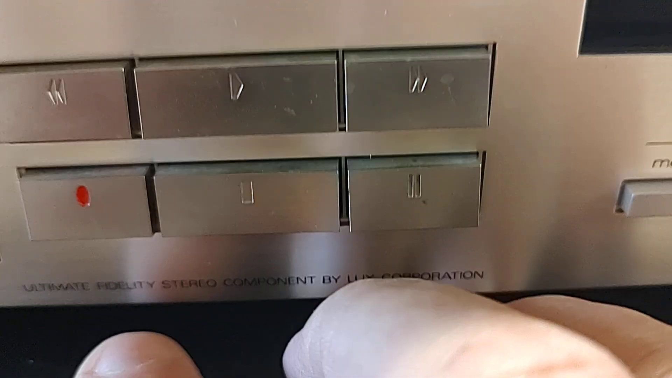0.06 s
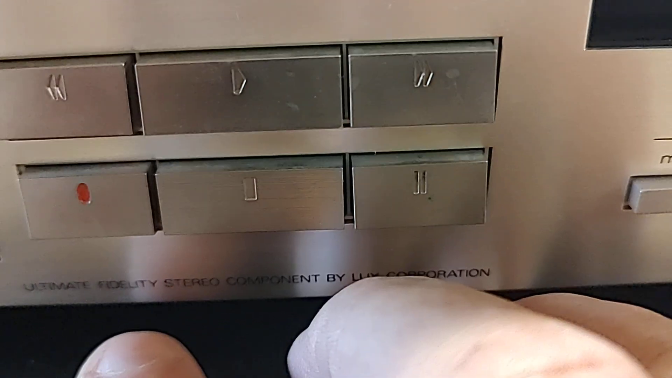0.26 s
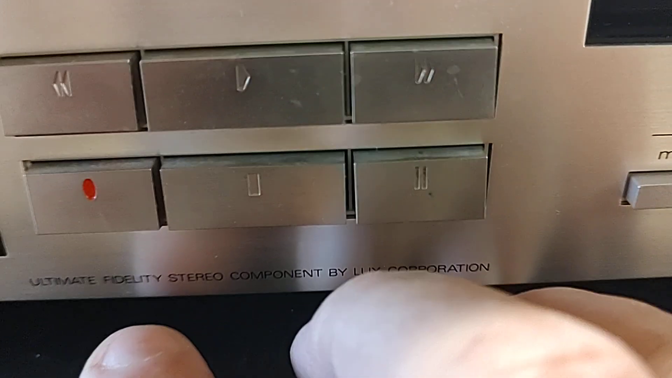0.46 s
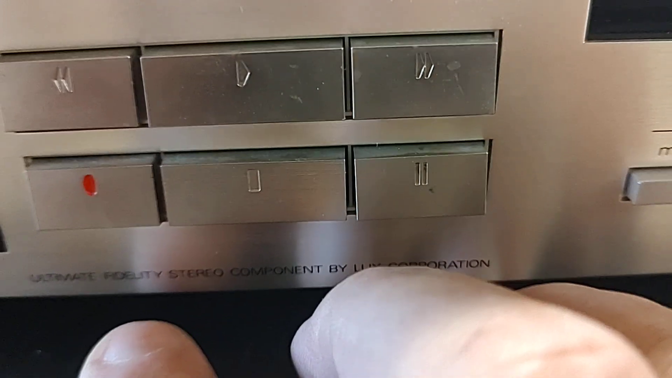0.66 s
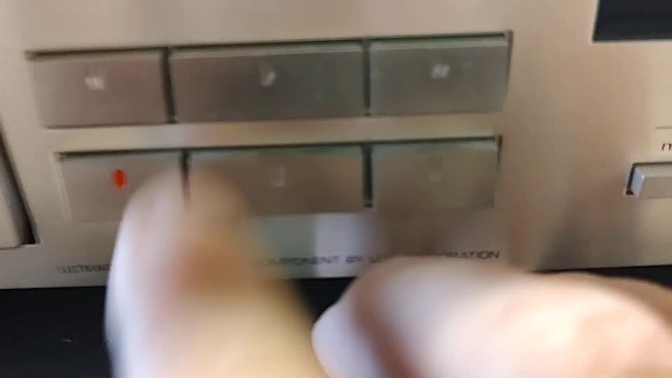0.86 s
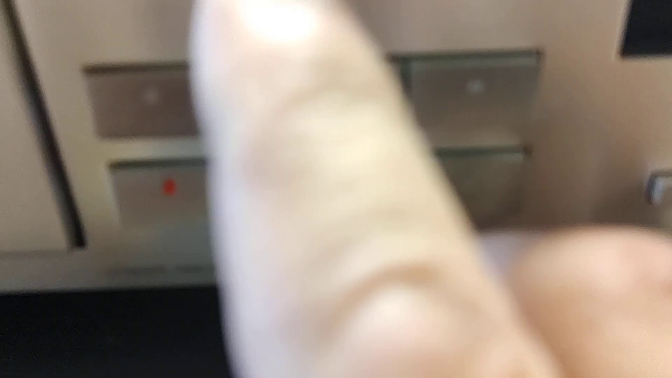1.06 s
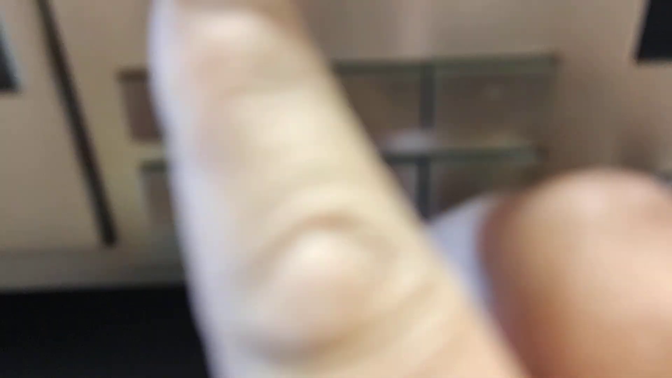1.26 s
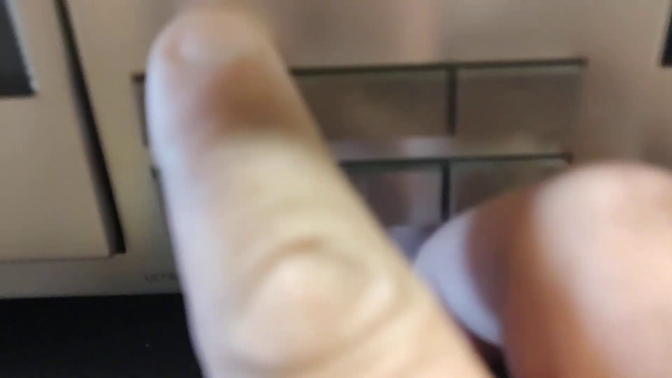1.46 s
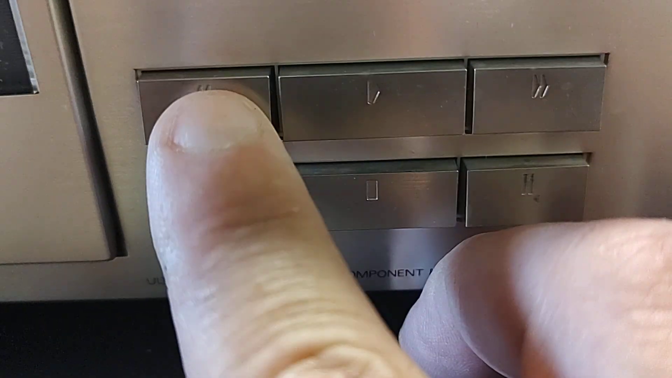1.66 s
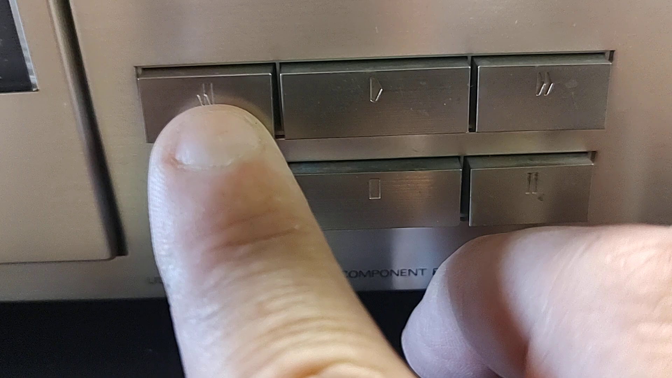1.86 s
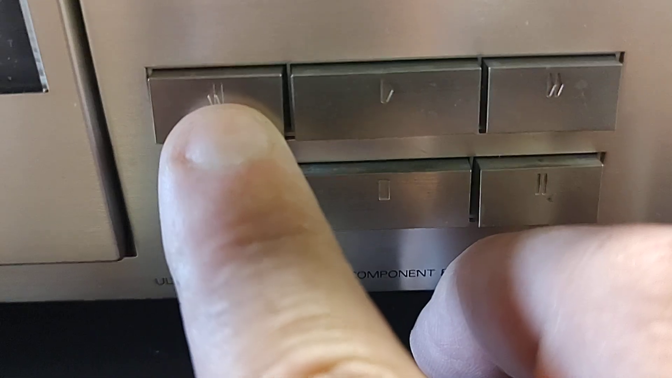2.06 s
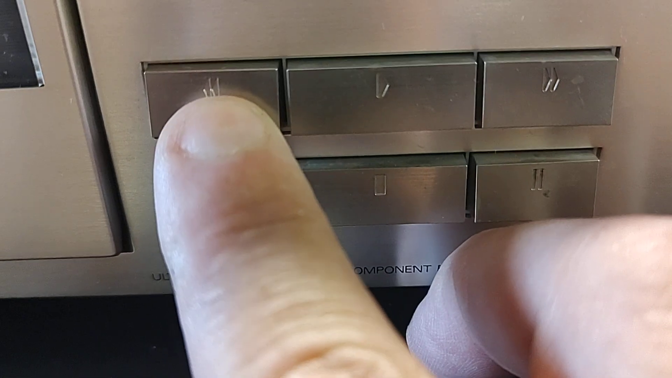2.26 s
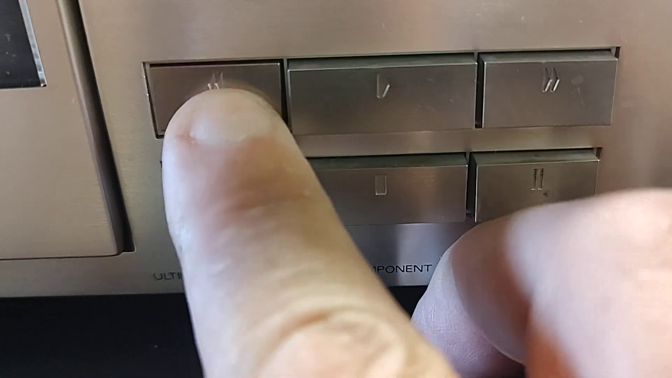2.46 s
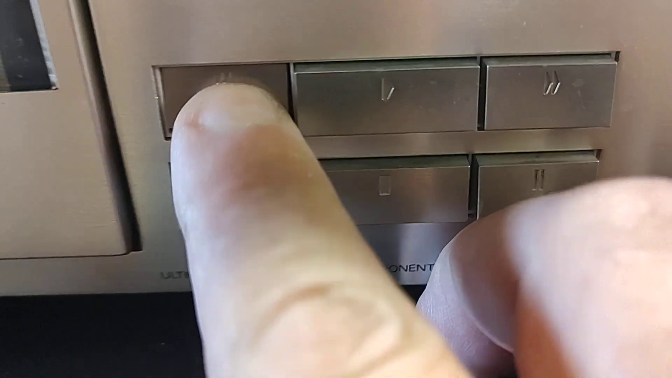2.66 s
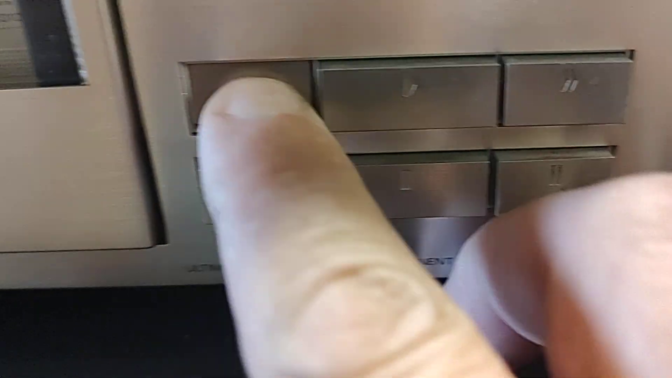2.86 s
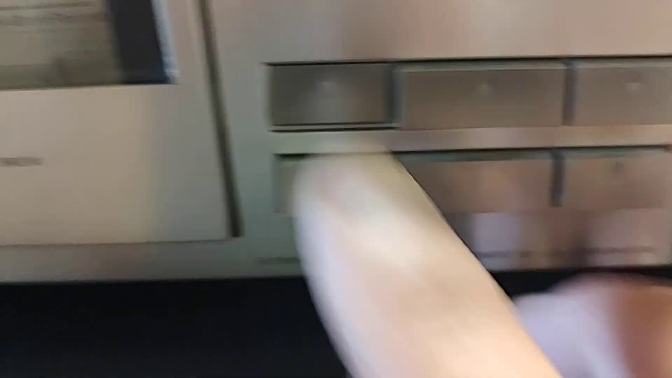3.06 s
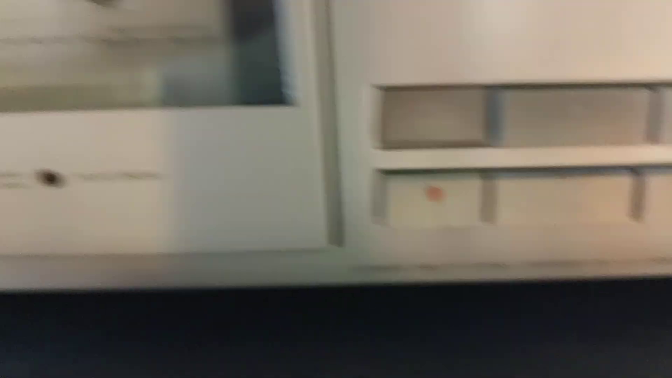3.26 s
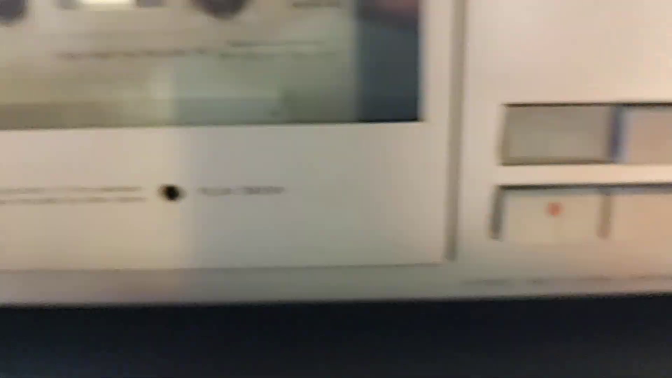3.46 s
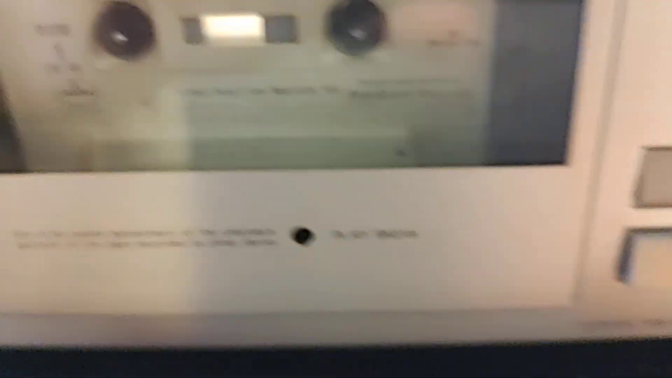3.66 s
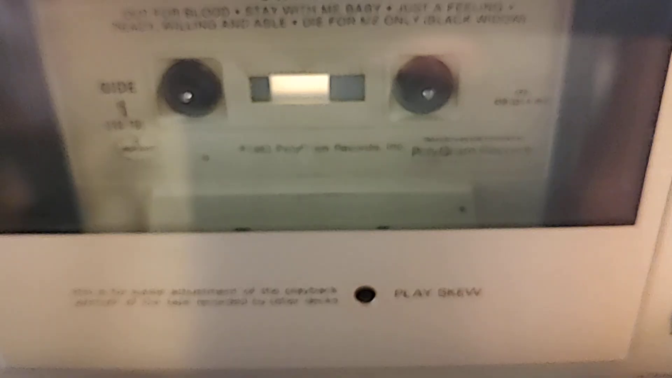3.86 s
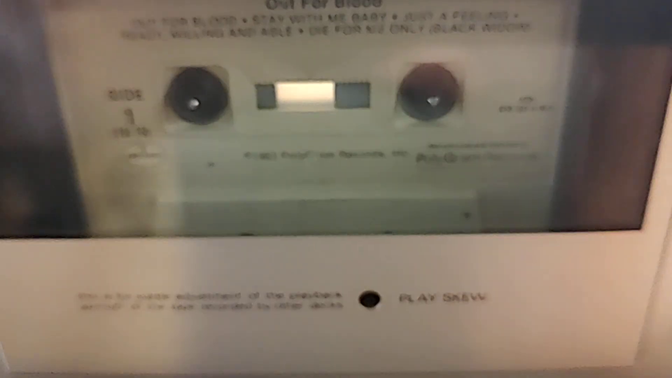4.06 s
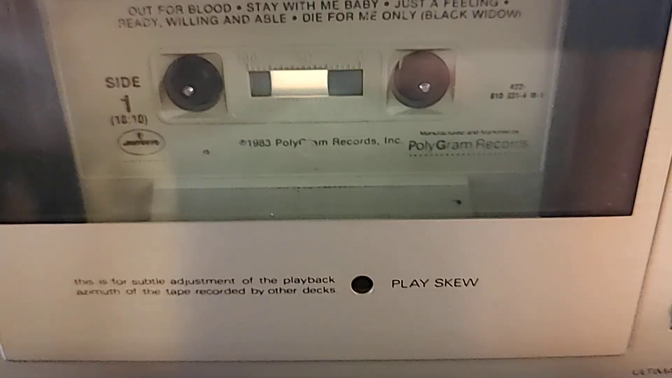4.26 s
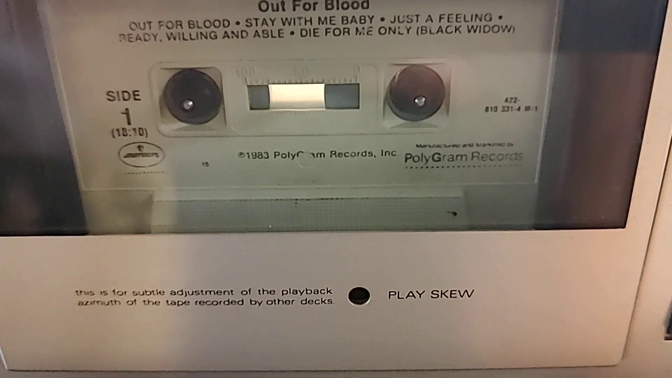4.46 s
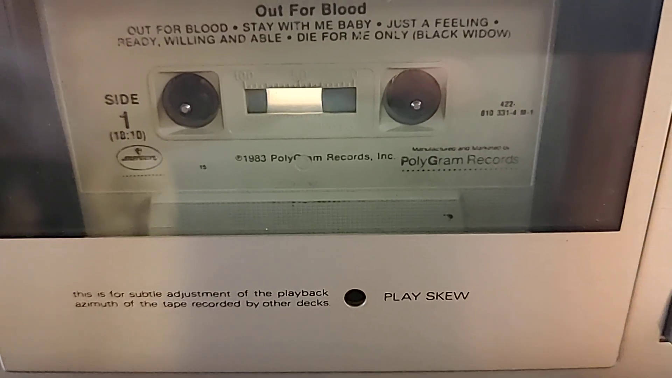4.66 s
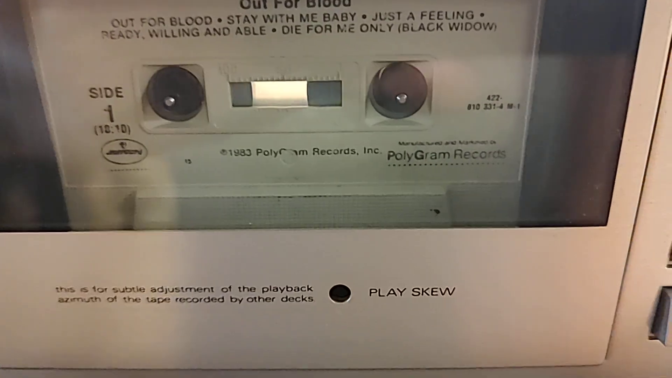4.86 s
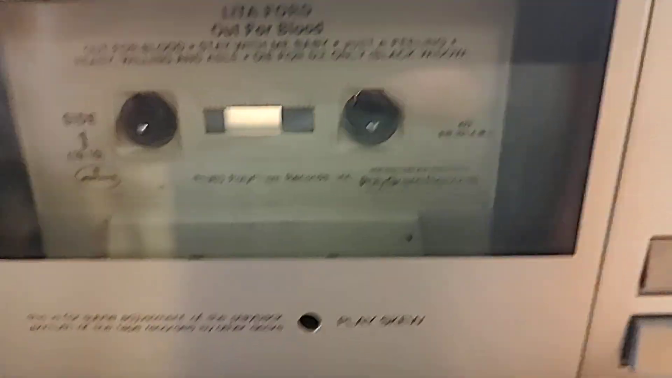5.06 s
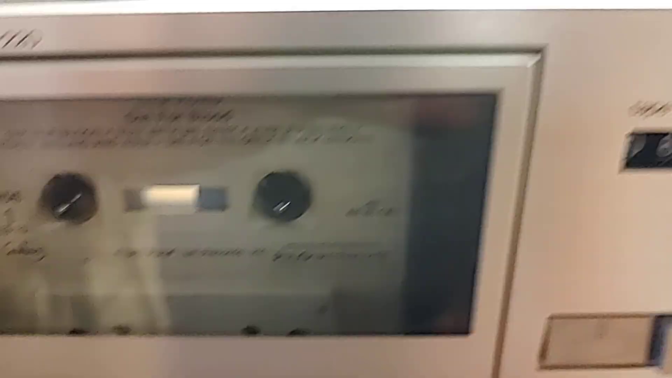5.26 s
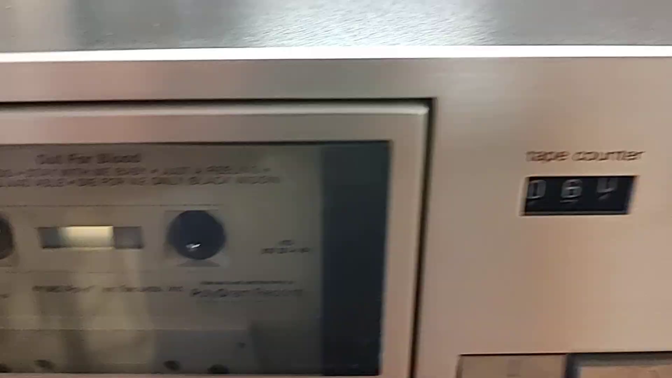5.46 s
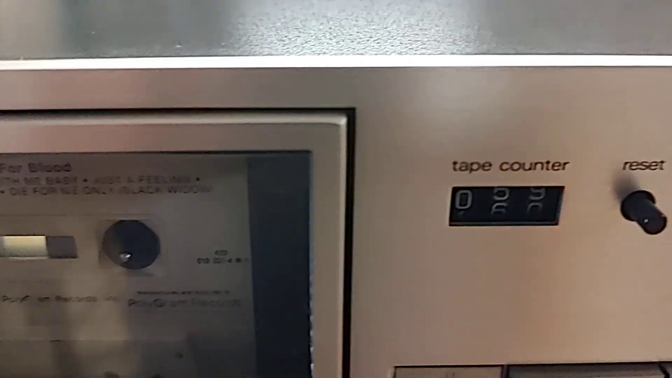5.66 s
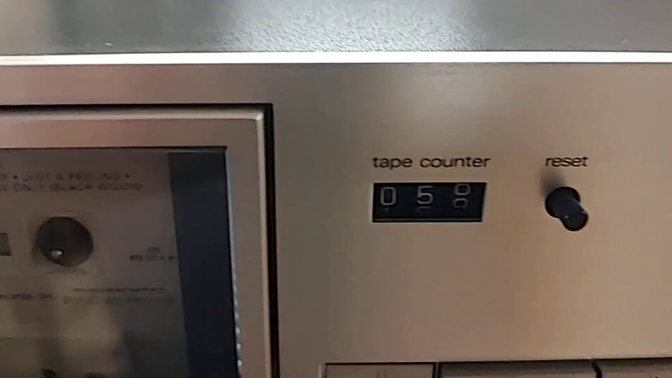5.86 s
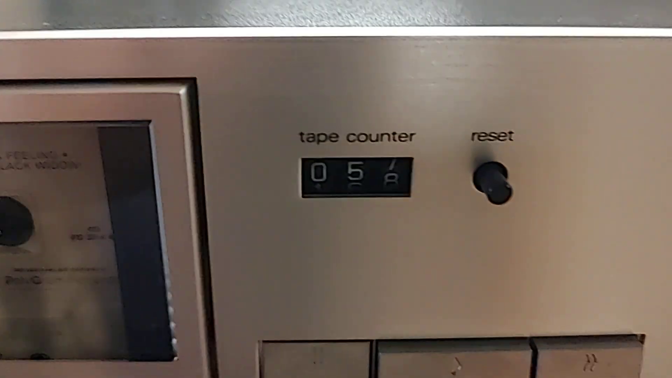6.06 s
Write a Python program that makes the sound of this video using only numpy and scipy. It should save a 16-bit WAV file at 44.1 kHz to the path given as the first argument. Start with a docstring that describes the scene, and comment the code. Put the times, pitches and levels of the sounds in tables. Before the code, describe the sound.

Close stereo pickup of a tape deck indoors: faint low hum, slight hiss, soft finger touches and two small hard ticks. After about two and a half seconds a lever and solenoid clunk sharply, then a rough, rapidly fluttering whir runs to the end. Metallic hand scrapes and dull handling knocks come just after it starts; later, light dry ticks and rattles ride over the whir, which leans left and grows brighter.

```python
"""Hum and motor buzz of an idling tape deck in a quiet room, with faint finger touches on its panel.
Something nearby gives two double ticks; then a key is pressed, a solenoid clunks and the reels rewind.
Noise drives the rubbing and struck parts, resonances colour it, and wavering sines make hum and gear mesh.
A hand-held stereo microphone, its left port facing the deck, is bumped and scraped and drifts along the front."""
import sys
import numpy as np
from scipy import signal
from scipy.fft import rfft, irfft, next_fast_len
from scipy.io import wavfile

SR = 44100
rng = np.random.default_rng(int(sys.argv[2]) if len(sys.argv) > 2 else 0)


def voltage_ratio(level):
    """Linear amplitude factor for a level in decibels (scalar or array-like)."""
    return 10 ** (np.asarray(level, float) / 20)


def unload_audio(sound):
    """Save the sound as a 16-bit wav file, at the path given as the first command line argument."""
    columns = np.transpose(np.atleast_2d(sound))
    # keep every value between -1 and 1, then stretch to whole-number steps
    steps = np.round(np.clip(columns, -1, 1) * 32767)
    wavfile.write(sys.argv[1], SR, steps.astype(np.int16))


N = 269451
SIZE = next_fast_len(N + 8192)
HZ = np.maximum(np.fft.rfftfreq(SIZE, 1 / SR), 1)
TIME = np.arange(N) / SR

# All table and source levels are relative: later gains and filters still act on them.
REEL_HZ = 34.92   # turns of the reel motor a second
ENGAGE_S, SPIN_UP_S = 2.65, 0.1146   # the reels are clutched in
LOADED = np.clip((TIME - ENGAGE_S) / SPIN_UP_S, 0, 1)   # 0 idling, 1 pulling the tape

# How far the left port exceeds the right for sound from the room: pitch_hz, lean_db
ROOM_LEAN = [(60, 2.5), (180, 1.5), (550, 5.5), (1650, 8.5), (4970, 7.5), (15000, 1.5)]
# The same for sound from the deck: pitch_hz, lean_db
DECK_LEAN = [(250, 15), (640, 13), (1350, 17.5), (2300, 12.5), (3300, 10.5), (4000, 10.5), (5500, 1),
             (6600, 20), (7500, 13), (9000, 22), (11500, 50), (15000, 53)]


def rms_one(x):
    """Scale to rms 1."""
    return x / np.sqrt(np.mean(x ** 2) + 1e-20)


def in_time(rows):
    """Columns of a curve table, interpolated sample by sample."""
    s, *columns = np.transpose(rows)
    return [np.interp(TIME, s, column) for column in columns]


def at_hz(points):
    """A spectrum table interpolated over log frequency on the FFT grid."""
    hz, values = np.transpose(points)
    return np.interp(np.log(HZ), np.log(hz), values)


def drift(rate_hz):
    """Slow random wander of spread 1, drawn at every 40th sample."""
    r = np.exp(-80 * np.pi * rate_hz / SR)
    noise = rng.standard_normal(N // 40 + 2002)
    slow = signal.lfilter([1], [1, -2 * r, r * r], noise)[2000:]
    return np.interp(np.arange(N) / 40, np.arange(len(slow)), rms_one(slow))


def noise_pair():
    """Two unrelated white noises, one for each path to the ports."""
    return rng.standard_normal((2, N))


def band(x, low_hz, high_hz):
    """Band-pass."""
    return signal.sosfilt(signal.butter(2, [low_hz, high_hz], "band", fs=SR, output="sos"), x)


def ring(force, hz, t60_s):
    """A resonance: a unit click sets a decaying sine of starting height 1 ringing."""
    r, w = 10 ** (-3 / (t60_s * SR)), 2 * np.pi * hz / SR
    return signal.lfilter([0, np.sin(w)], [1, -2 * r * np.cos(w), r * r], force + 1e-18)


def bursts(times_s, levels_db, decay_ms, rise_ms=0.71):
    """Envelope of quick exponential rises that die away; both times are time constants."""
    out = np.zeros(N)
    for s, db, ms in np.broadcast(times_s, levels_db, decay_ms):
        start = int(s * SR)
        after = np.arange(min(int((ms + rise_ms) * SR / 125), N - start))
        t_ms = after * 1000 / SR
        out[start + after] += voltage_ratio(db) * np.exp(-t_ms / ms) * (1 - np.exp(-t_ms / rise_ms))
    return out


def struck(envelope, modes, ring_db):
    """Noisy contact force into a body's modes, drawn anew for each mode and path."""
    rung = sum(voltage_ratio(db) * ring(envelope * noise_pair(), hz, t60_s) for hz, db, t60_s in modes)
    return voltage_ratio(ring_db) * rung


def tone(hz, waver_db, waver_rad=0.34):
    """A sine of nominal rms 1 whose level and phase waver."""
    phase = 2 * np.pi * (np.cumsum(hz) / SR + rng.random()) + waver_rad * drift(2.1)
    return np.sqrt(2) * voltage_ratio(waver_db * drift(10.7)) * np.sin(phase)


def ports(pair, lean, colour=1):
    """The right port hears the left's sound later and weaker, mixed with an unrelated path."""
    # left-right likeness, falling towards the treble: pitch_hz, share (0 to 1)
    likeness = [(60, 1), (250, 1), (600, 0.7), (1200, 0.5), (4000, 0.56), (8000, 0.22)]
    lag_s = .0003
    near, other = rfft(pair, SIZE) * colour
    alike = np.clip(at_hz(likeness), 0, 1)
    late = near * np.exp(-2j * np.pi * HZ * lag_s)
    right = alike * late + np.sqrt(1 - alike ** 2) * other
    return irfft([near, right * voltage_ratio(-at_hz(lean))], SIZE)[:, :N]


def nearby_walls(x, wet_db, t60_s):
    """Dense early reflections from the desk and cabinet fill the gaps between hits."""
    t = TIME[:SR // 4]
    tail = rng.standard_normal((2, len(t))) * voltage_ratio(-60 * t / t60_s) * (t > .002)
    tail = tail / np.sqrt(np.sum(tail ** 2) / 2)
    return x + voltage_ratio(wet_db) * signal.fftconvolve(x, tail, axes=1)[:, :N]


def room():
    """Distant ventilation and the microphone's own hiss: coloured noise with a slight swell."""
    # shape of the room's spectrum: pitch_hz, density_db (relative, per Hz)
    room_spectrum = [(15, -65), (25, -55), (64, -10.5), (121, -11), (163, -8), (224, -10), (529, -14.5),
                     (749, -20.5), (833, -9.5), (903, -16), (1240, -13.5), (1460, -24), (3930, -34),
                     (9020, -59), (15000, -50.5)]
    room_db = -62
    swell = voltage_ratio(0.18 * drift(16.0))
    noise = ports(noise_pair() * swell, ROOM_LEAN, voltage_ratio(at_hz(room_spectrum)))
    return voltage_ratio(room_db) * rms_one(noise)


def mains_hum():
    """Mains hum beats with a motor just under its pitch; unsteady hums lie above."""
    # unsteady hums: pitch_hz, level_db
    unsteady_hums = [(203, -72), (291, -83)]
    mains_hz, fan_hz = 119.99, 117.11
    hum_db, fan_db, fan_second_db = -59.5, -72.5, -70
    since = 2 * np.pi * (TIME - 0.28)   # the two hums are in step at 0.28 s
    hum = voltage_ratio(hum_db + 0.58 * drift(5.6)) * np.cos(mains_hz * since)
    fan = voltage_ratio(fan_db) * np.cos(fan_hz * since)
    fan += voltage_ratio(fan_second_db) * np.cos(2 * fan_hz * since)
    above = sum(voltage_ratio(db) * tone(np.full(N, hz), 1.8) for hz, db in unsteady_hums)
    return above + np.sqrt(2) * (hum + fan)


def motor_buzz():
    """Harmonics of the motor, which slows and flutters when it pulls the tape."""
    # harmonics of the buzz: multiple, idle_db, loaded_db
    harmonics = [(6, -83, -63), (7, -64.5, -63), (8, -73, -62), (10, -74.5, -63), (11, -81, -58.5),
                 (12, -125, -68.5)]
    idle_hz, loaded_hz = 118.59, 115.6
    pitch = idle_hz + LOADED * (loaded_hz - idle_hz)
    out = np.zeros(N)
    for multiple, idle_db, loaded_db in harmonics:
        flutter = 1 + 0.0039 * LOADED * drift(11.7)
        level = voltage_ratio(idle_db + LOADED * (loaded_db - idle_db))
        out += level * tone(multiple * pitch * flutter, 1.0, waver_rad=0.33)
    return out


def gear_mesh():
    """Meshing teeth sound at multiples of the reel motor's turn rate once it is clutched in."""
    # mesh tones: multiple of the turn rate, level_db
    mesh_tones = [(10, -66.5), (20, -72.5), (30, -64)]
    wobble = 1 + 0.3 * np.cos(np.pi / 2 * REEL_HZ * TIME)   # once in four turns
    tones = sum(voltage_ratio(db) * tone(np.full(N, k * REEL_HZ), 2.4, waver_rad=0.87) for k, db in mesh_tones)
    return LOADED * wobble * tones


def hums():
    """All steady tones at the microphone; their quarter-cycle shift serves as the other path."""
    out = mains_hum() + motor_buzz() + gear_mesh()
    shifted = signal.hilbert(out, SIZE)[:N].imag
    return ports([out, shifted], ROOM_LEAN) * voltage_ratio(2.0)


def finger_touches():
    """Fingers brush the panel: short noise in two bands, a panel ring, and a stutter along a key."""
    # faint touches: start_s, level_db, treble_db
    touch_rows = [(0.045, -57.5, -77), (0.094, -54, -71), (0.266, -57.5, -86), (0.714, -56, -90),
                  (1.519, -66, -70), (1.982, -55.5, -72), (2.107, -58, -78)]
    s, level_db, treble_db = np.transpose(touch_rows)
    out = band(bursts(s, level_db, 30.0, rise_ms=1.0) * noise_pair(), 1520, 3240)
    out += band(bursts(s, treble_db, 7.6) * noise_pair(), 5100, 16000)
    press = bursts(s, level_db, 11.8, rise_ms=4.9) * rng.standard_normal(N)
    out += voltage_ratio(-16.5) * ring(press, hz=997, t60_s=0.14)
    # a fingertip slips six times along a key
    slip_s = 1.573 + .0325 * np.arange(6)
    slips = bursts(slip_s, -65 + rng.normal(0, 2.5, 6), 7.0, rise_ms=2.8)
    return out + band(slips * noise_pair(), 3600, 6200)


def double_ticks():
    """Something nearby snaps: each tick has a lead-in and a bounce, and rings small hard modes."""
    # double ticks: start_s, level_db
    tick_rows = [(0.4593, -41), (1.7972, -38)]
    # lead-in, main tick and bounce: offset_ms, step_db
    tick_steps = [(-19, -6), (1, 2), (47, -20)]
    # modes of the ticking body: pitch_hz, level_db, t60_s
    tick_modes = [(850, -20, 0.066), (1300, -20.5, 0.09), (1980, -18.5, 0.042), (2360, -6, 0.012),
                  (2800, -12.5, 0.0084), (3580, -14.5, 0.013), (4310, -25, 0.019), (5700, -36, 0.012),
                  (7740, -24, 0.011)]
    steps = [(s + ms / 1000, db + step_db) for s, db in tick_rows for ms, step_db in tick_steps]
    s, level_db = np.transpose(steps)
    snap = bursts(s, level_db, 4.3, rise_ms=0.061)
    tail = bursts(s, level_db - 10, 12.7, rise_ms=1.8)
    force = (snap + tail) * voltage_ratio(3.0 * drift(200))   # crackly
    ticks = struck(force, tick_modes, ring_db=-12.0)
    ticks += voltage_ratio(-10) * band(force * noise_pair(), 2800, 4500)
    return band(band(ticks, 710, 4500), 500, 9000)


def bump_rows():
    """The hand's bumps as columns: start_s, push_db, knock_db, knock_hz."""
    # dull bumps of the hand: start_s, push_db, knock_db, knock_hz
    hand_bumps = [(1.675, -67.5, -59, 560), (3.072, -67, -43.5, 840), (3.093, -66, -45, 800),
                  (3.114, -68, -47, 535), (3.278, -86, -45, 630), (3.549, -50.5, -37.5, 780),
                  (3.559, -49.5, -35, 480), (3.58, -53.5, -40, 450), (3.616, -59, -47, 410)]
    return np.transpose(hand_bumps)


def bump_knocks():
    """The sharper part of a bump strikes the modes near its own pitch hardest."""
    # modes a knock rings: pitch_hz, level_db, t60_s
    knock_modes = [(423, -3, 0.02), (540, -2, 0.046), (630, -7, 0.024), (770, -2, 0.044), (890, 4, 0.023)]
    fall_db_per_octave = 20
    s, _, knock_db, knock_hz = bump_rows()
    out = np.zeros((2, N))
    for mode in knock_modes:
        octaves = abs(np.log2(mode[0] / knock_hz))
        force = bursts(s, knock_db - fall_db_per_octave * octaves, 7.8)
        out += struck(force, [mode], ring_db=-15.0)
    return band(out, 230, 1000)


def bump_thuds():
    """A soft one-sided push on the microphone rings low modes, in step in both ports."""
    # low modes of a bump: pitch_hz, level_db, t60_s
    thud_modes = [(98.5, 1, 0.065), (202.3, 2, 0.12), (327, 1, 0.015)]
    s, push_db, _, _ = bump_rows()
    push = bursts(s, push_db, 0.55)
    thuds = sum(voltage_ratio(db) * ring(push, hz, t60_s) for hz, db, t60_s in thud_modes)
    return band(band(thuds, 93, 670), 77, 960) * voltage_ratio([[1.5], [-1.5]])


def small_sounds():
    """Ticks, touches and knocks reach the ports with the room's lean; thuds go straight in."""
    airborne = double_ticks() + finger_touches() + bump_knocks()
    return ports(airborne, ROOM_LEAN) * voltage_ratio([[3], [0.3]]) + bump_thuds()


def scrapes():
    """Skin dragging over brushed metal: slips of grainy friction around 3 kHz."""
    # the hand scrapes off the panel: start_s, level_db, rise_ms, fade_ms
    scrape_rows = [(2.865, -19.5, .8, 7.3), (3.255, -32, 3, 10), (3.277, -25, 3, 13), (3.299, -29, 3, 12),
                   (3.317, -26, 4, 22), (3.347, -26, 3, 13), (3.392, -26, 4, 16), (3.416, -22, 3.2, 28),
                   (3.437, -21, 3.5, 16), (3.493, -28, 3, 10)]
    slips = sum(bursts(s, db, fade_ms, rise_ms) for s, db, rise_ms, fade_ms in scrape_rows)
    force = slips * voltage_ratio(2.0 * drift(160))
    return ports(band(band(force * noise_pair(), 2950, 3850), 1400, 4400), DECK_LEAN)


def clunk():
    """Each contact scrapes for a moment, rings the frame's low and high modes and cracks in the treble."""
    # solenoid and lever contacts: start_s, level_db, low_body_db, treble_db, scrape_ms (decay)
    contacts = [(2.533, -52, -50, -69, 2.1), (2.573, -38, -28, -52, 2), (2.58, -33, -37, -38.5, 12.4),
                (2.599, -39, -24, -67, 1.7), (2.623, -22.5, -38, -41, 7.9), (2.634, -21.5, -24, -28, 6.9),
                (2.6403, -10, -28, -25.5, 3.4), (2.648, -39, -24.5, -20, 3.4),
                (2.657, -26.5, -31, -38, 9.1), (2.678, -31, -25, -57, 7), (2.733, -37, -33, -48, 12.4)]
    # modes of the deck's frame: pitch_hz, level_db, t60_s
    frame_modes = [(254, -21.5, 0.11), (603, -27, 0.18), (710, -13.5, 0.062), (828, -12.5, 0.14),
                   (950, -6, 0.038), (1210, -5.5, 0.025), (1990, -6.5, 0.025), (2250, -8, 0.04),
                   (2590, -0.5, 0.018), (3140, -6, 0.015), (3660, -9.5, 0.021)]
    # left over right for the clunk: pitch_hz, lean_db
    clunk_lean = [(180, 6), (700, 1.5), (1300, 4.5), (2400, 14.5), (4400, 5), (15000, 13)]
    body_top_hz = 1100
    low_modes = [mode for mode in frame_modes if mode[0] < body_top_hz]
    high_modes = [mode for mode in frame_modes if mode[0] > body_top_hz]
    s, level_db, low_db, treble_db, scrape_ms = np.transpose(contacts)
    force = bursts(s, level_db, scrape_ms, rise_ms=2.5)
    body = struck(bursts(s, low_db, 6.3, rise_ms=4.0), low_modes, ring_db=-15.0)
    body += struck(force, high_modes, ring_db=-15.0)
    body += voltage_ratio(8.5) * band(force * noise_pair(), 780, 3900)   # the scrape itself
    crack = band(bursts(s, treble_db, 3.44, rise_ms=0.9) * noise_pair(), 4300, 11400)
    return ports(band(band(body, 160, 3600), 130, 8200) + crack, clunk_lean) * voltage_ratio(1.5)


def hub_ticks():
    """Short bright clicks from the turning hubs: brief bursts of treble noise."""
    # hub ticks: start_s, level_db
    hub_rows = [(3.7961, -56), (3.9143, -51), (3.9468, -49), (4.0056, -52), (4.0311, -54), (4.06, -56),
                (4.2067, -53), (4.2695, -50), (4.298, -46), (4.3573, -49), (4.4146, -48.5), (4.6187, -51),
                (4.6936, -54), (4.7509, -48)]
    s, level_db = np.transpose(hub_rows)
    force = bursts(s, level_db, 6.7, rise_ms=1.2)
    return ports(band(force * noise_pair(), 6300, 11200), DECK_LEAN) * voltage_ratio(7.0)


def counter_wheel(place):
    """Every tooth ticks once a turn; which teeth stand out depends on where the microphone is."""
    # five teeth: offset_ms into the turn, window_db, counter_db (heard at those places)
    teeth = [(0, -50, -34), (28.7, -58, -56), (61, -68, -32), (87, -39.5, -50), (116, -59, -34)]
    from_s, turn_s = 4.7998, .1434
    rows = []
    for start in np.arange(from_s, N / SR, turn_s):
        for ms, *levels_db in teeth:
            s = start + ms / 1000
            if s < N / SR:
                rows.append((s, np.interp(place[int(start * SR)], [1, 2], levels_db)))
    s, level_db = np.transpose(rows)
    uneven_db = level_db + 2.3 * rng.standard_normal(len(s)) - 1
    force = bursts(s, uneven_db, 5.2, rise_ms=1.15)
    return ports(band(force * noise_pair(), 6200, 9200), DECK_LEAN)


def rattle_surge():
    """Hub rattles as sudden surges of force: loud ones at set times, 16 weaker ones at random."""
    # the loudest hub rattles: start_s, level_db
    loud_rattles = [(3.95, -48), (4.062, -46.5), (4.386, -51), (4.827, -44.5), (4.9104, -40.5),
                    (5.026, -47), (5.115, -40.5), (5.131, -42), (5.153, -48), (5.2747, -51), (5.4124, -47),
                    (5.807, -47)]
    s, level_db = np.transpose(loud_rattles)
    chance = rng.random((16, 2))
    s = np.r_[s, 3.7 + 2.35 * chance[:, 0]]
    level_db = np.r_[level_db, -70.5 + 6.0 * chance[:, 1]]
    return bursts(s, level_db, 7.0, rise_ms=1.8)


def cabinet_colour():
    """Spectrum of rubbing gears and tape with the cabinet's resonances on top, scaled to rms 1."""
    # shape of the rubbing: pitch_hz, density_db (relative, per Hz)
    rub_spectrum = [(150, -52), (250, -14.5), (540, -18.5), (699, -8.5), (858, -9.5), (1390, -5),
                    (1590, -6.5), (1950, 3.5), (2360, -4), (3880, -11.5), (6710, -25), (12900, -31.5),
                    (15000, -31)]
    # cabinet resonances: pitch_hz, width_hz, level_db
    cabinet_modes = [(1031, 25, 0.5), (1395, 23, 3), (4790, 24, -9), (6180, 26, -15.5), (8650, 370, -21.5),
                     (10030, 350, -26)]
    peaks = np.zeros(len(HZ), complex)
    for k, (hz, width_hz, db) in enumerate(cabinet_modes):
        peaks += (-1) ** k * voltage_ratio(db + 2.5) / (1 + 1j * (HZ - hz) / (width_hz / 2))
    colour = np.hypot(voltage_ratio(at_hz(rub_spectrum)), np.abs(peaks))
    return colour / np.sqrt(np.mean(colour ** 2))


def rubbing(throb, surge):
    """Friction noise throbs with the reels; its low and high parts follow forces of their own."""
    # rubbing while rewinding: start_s, rub_db, treble_db
    rub_levels = [(2.75, -47, -48.5), (3.05, -45.5, -49.5), (3.45, -43, -41), (3.75, -43.5, -45.5),
                  (4.5, -42.5, -46.5), (5.3, -41, -42), (6.11, -41.5, -39)]
    rub_db, treble_db = in_time(rub_levels)
    grain = voltage_ratio(1.87 * drift(162))   # gear teeth catch unevenly
    low_force = voltage_ratio(rub_db + 0.39 * throb + 0.89 * drift(20)) * grain + 0.32 * surge
    high_force = voltage_ratio(treble_db + 1.43 * throb + 1.0 * drift(25)) * grain + voltage_ratio(-5) * surge
    colour = cabinet_colour()
    high = 1 / (1 + (5200 / HZ) ** 8)   # the two parts meet near 5200 Hz
    out = ports(noise_pair() * LOADED * low_force, DECK_LEAN, colour * (1 - high))
    return out + ports(noise_pair() * LOADED * high_force, DECK_LEAN, colour * high)


def ringing_parts(throb, surge, place):
    """Parts set ringing by friction: narrow noise whose level depends on the microphone's place."""
    # ringing parts: pitch_hz, half_width_hz (at half height), keys_db, window_db, counter_db
    ringing_rows = [(1813, 22, -52, -63, -56), (1965, 38, -75, -47.5, -57), (2260, 22, -76, -75, -56),
                    (2790, 65, -57, -52, -62), (3350, 73, -61, -67.5, -56), (3898, 58, -63.5, -50.5, -61),
                    (5470, 140, -72, -64.5, -73), (11600, 570, -78, -80, -64)]
    out = np.zeros((2, N))
    for hz, half_width_hz, *levels_db in ringing_rows:
        heard_db = np.interp(place, [0, 1, 2], levels_db)
        force = LOADED * voltage_ratio(heard_db + 3.24 * throb + 1.17 * drift(14)) * (1 + surge * voltage_ratio(58))
        peak = np.sqrt(9000 / half_width_hz) / (1 + ((HZ - hz) / half_width_hz) ** 2)
        out += ports(force * noise_pair(), DECK_LEAN, peak)
    return out


def rewinding():
    """Friction throbs at one, two and three times the turn rate; rattles add to the same force."""
    # the microphone drifts along the front: start_s, place (0 keys, 1 cassette window, 2 counter)
    mic_places = [(2.75, 0.3), (3.5, .1), (3.95, 0.99), (4.4, 0.88), (5.25, 0.9), (5.6, 1.67), (6.11, 2.34)]
    place, = in_time(mic_places)
    turn = 2 * np.pi * REEL_HZ * TIME + 1.2 * drift(1.5)
    throb = np.cos(turn) + 1.17 * np.cos(2 * turn + 2.06) + 0.42 * np.cos(3 * turn)
    surge = rattle_surge()
    deck = rubbing(throb, surge) + ringing_parts(throb, surge, place) + counter_wheel(place)
    return deck * voltage_ratio(3.5) + hub_ticks()


def scene():
    """Everything at the microphone."""
    hits = nearby_walls(clunk() + small_sounds(), wet_db=-13.0, t60_s=0.15)
    return room() + hums() + scrapes() + hits + rewinding()


def roll_off(x):
    """The treble ends steeply here."""
    return signal.sosfilt(signal.butter(12, 17000, fs=SR, output="sos"), x)


def record(dry):
    """The ports resonate near 15.5 kHz, the left one more strongly, and a steep filter cuts the top."""
    port_peak = 1 + voltage_ratio([[12], [3]]) / (1 + ((HZ - 15500) / 600) ** 2)
    coloured = irfft(rfft(dry, SIZE) * port_peak, SIZE)[:, :N]
    low_pass = signal.ellip(10, .5, 70, 15900, fs=SR, output="sos")   # ripple and stop-band in dB, edge in Hz
    return roll_off(signal.sosfilt(low_pass, coloured))


dry = scene()
out = record(dry)
unload_audio(out)
```